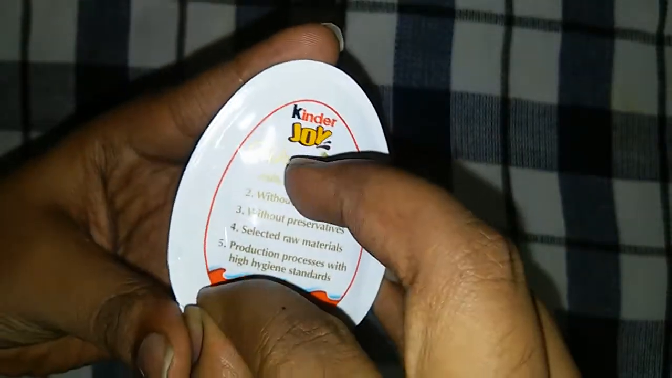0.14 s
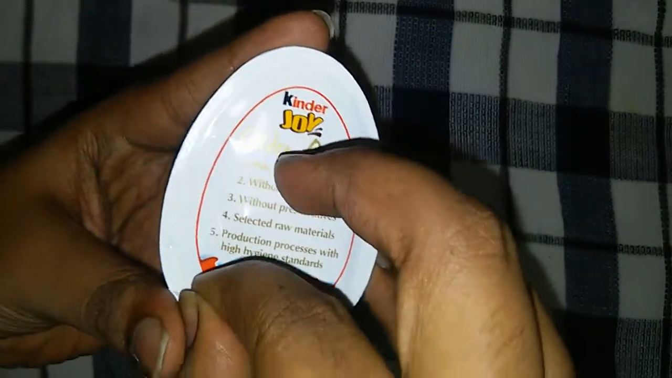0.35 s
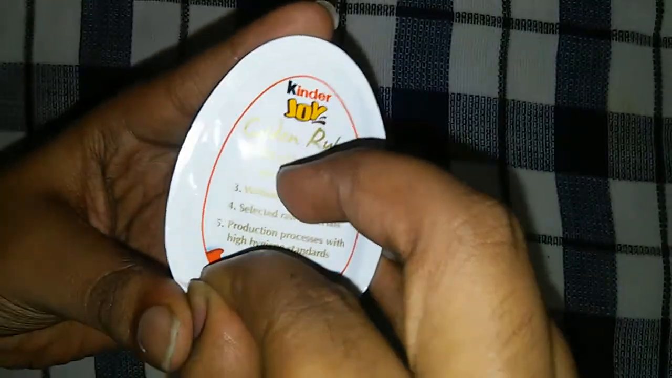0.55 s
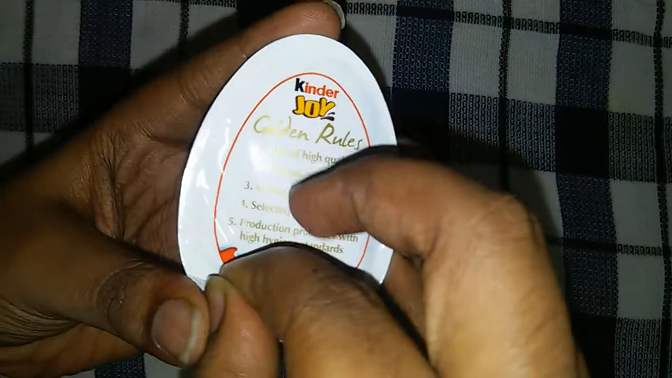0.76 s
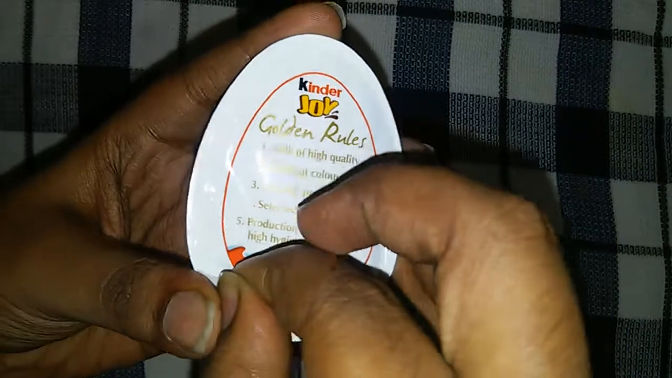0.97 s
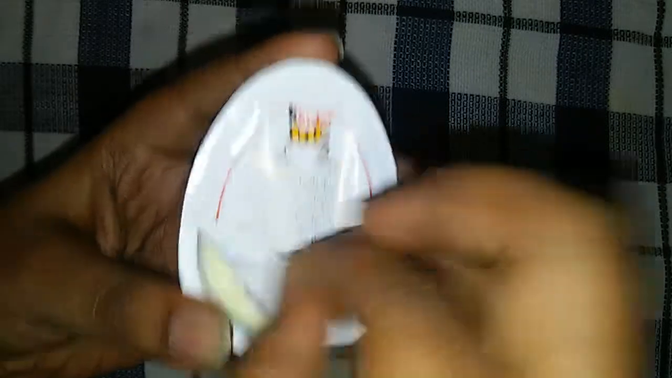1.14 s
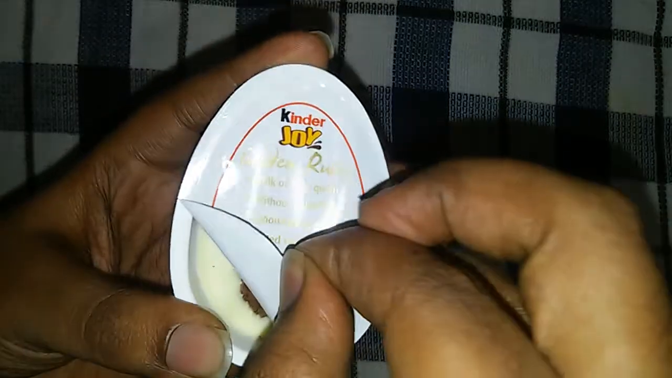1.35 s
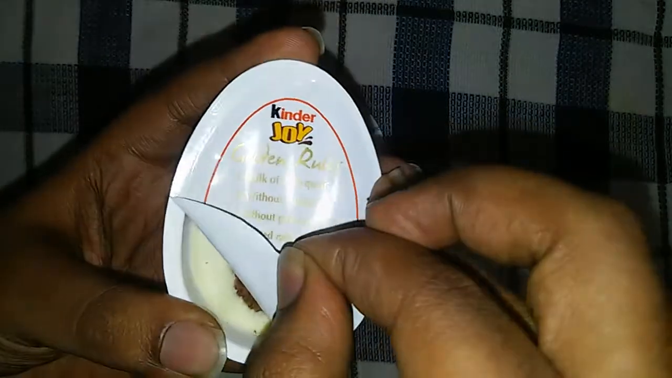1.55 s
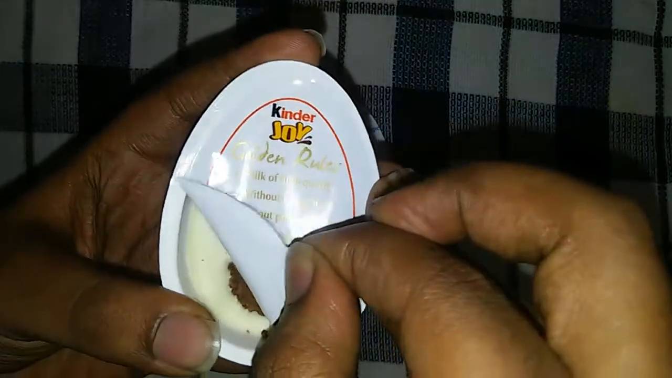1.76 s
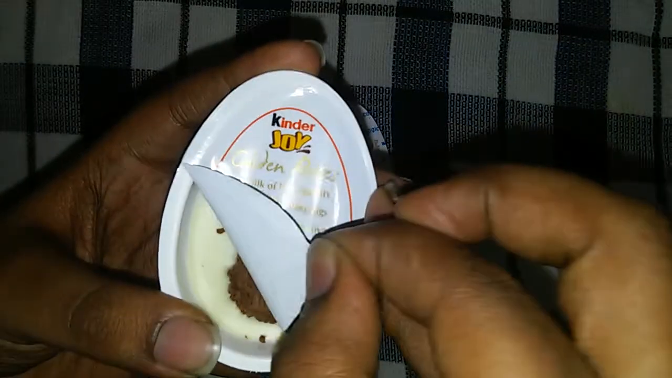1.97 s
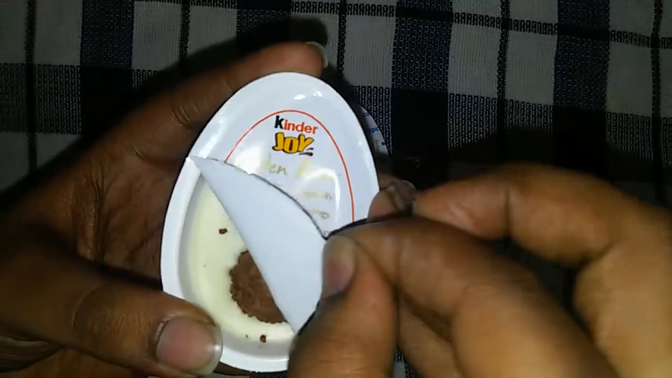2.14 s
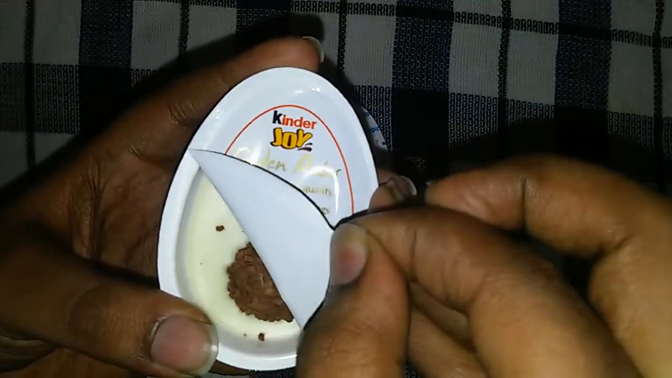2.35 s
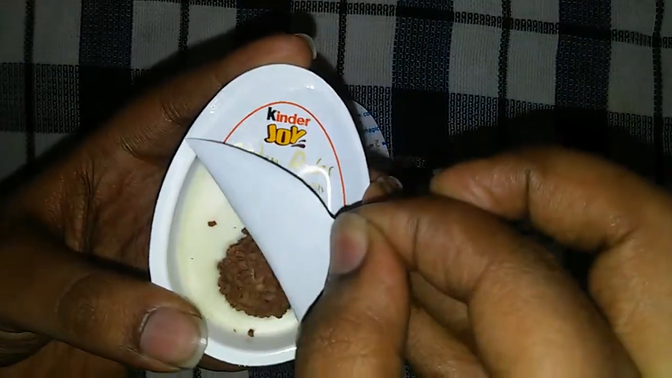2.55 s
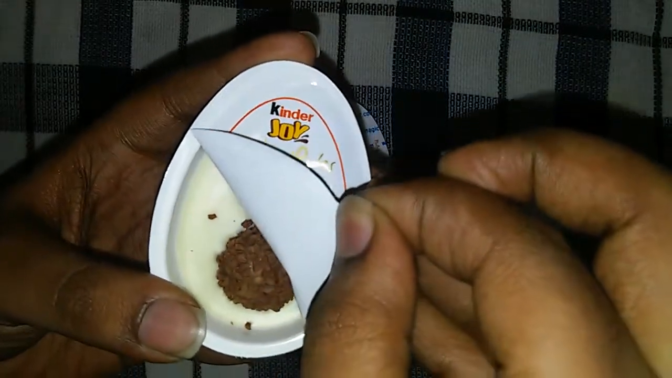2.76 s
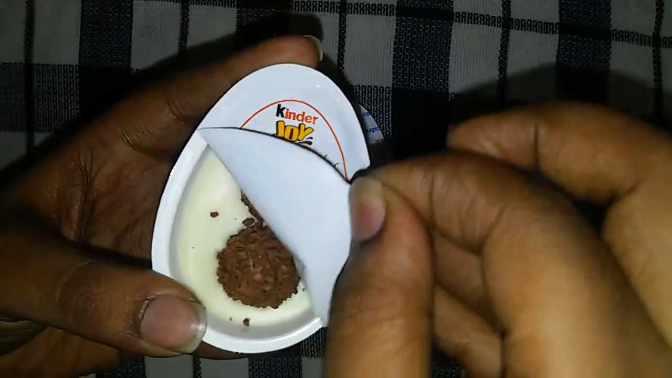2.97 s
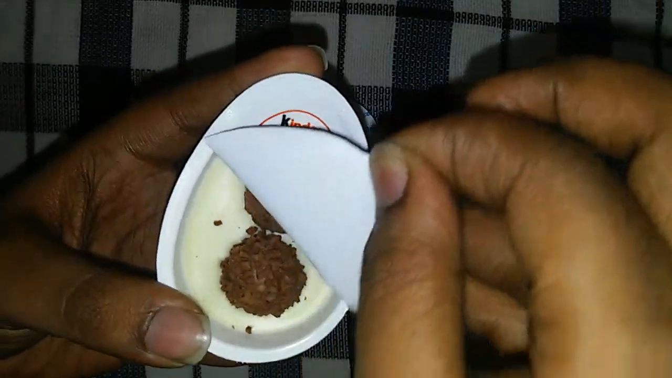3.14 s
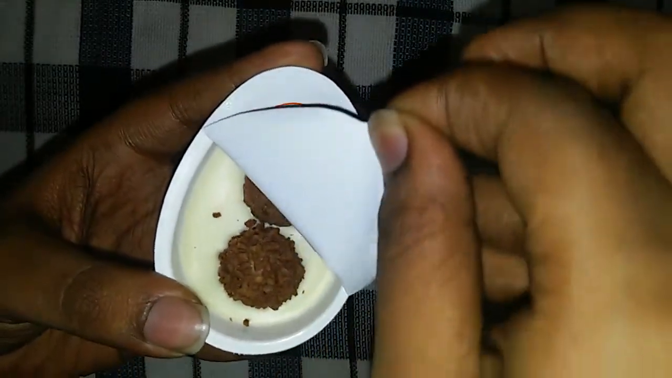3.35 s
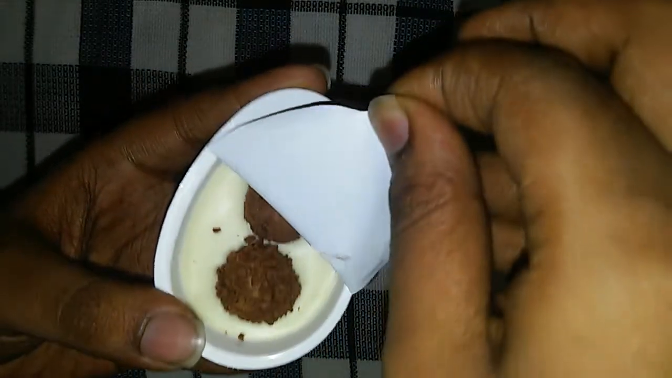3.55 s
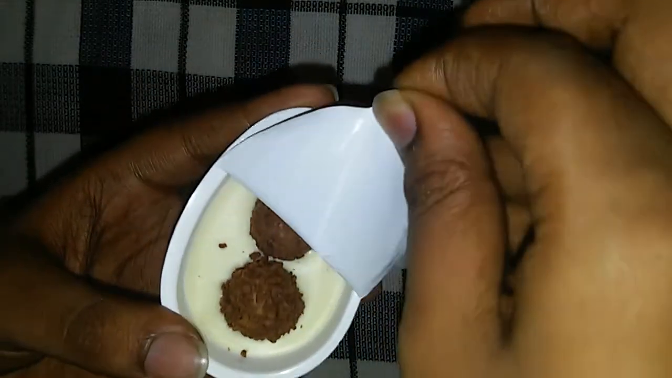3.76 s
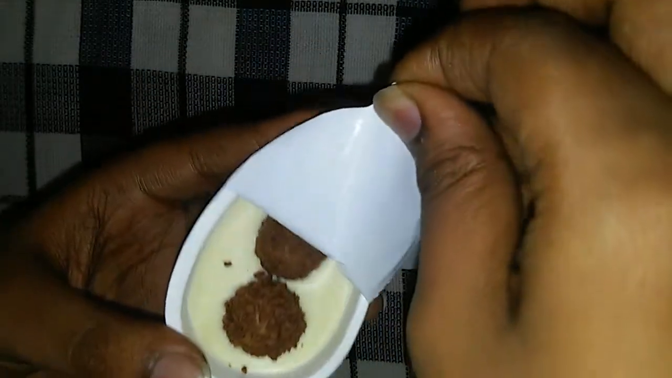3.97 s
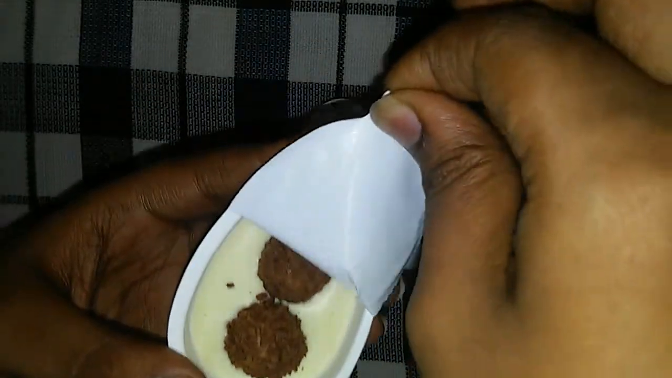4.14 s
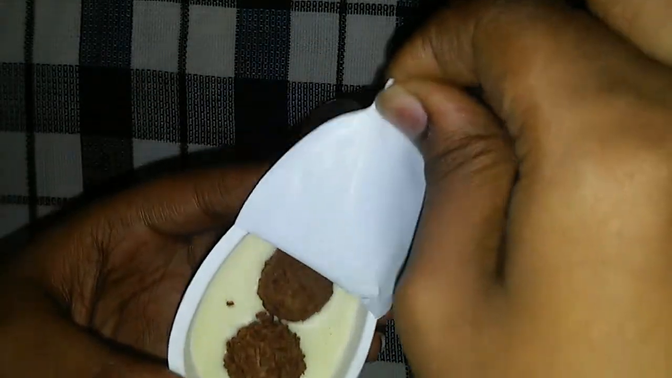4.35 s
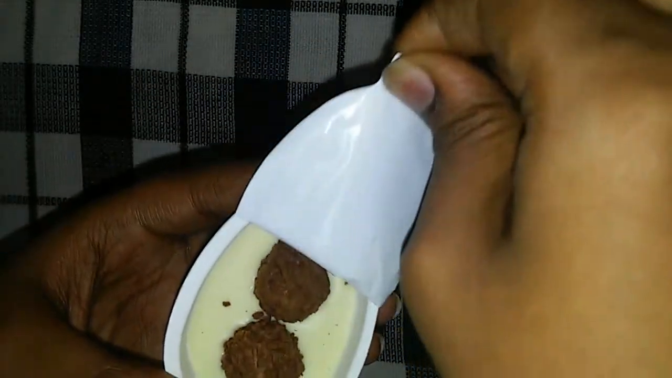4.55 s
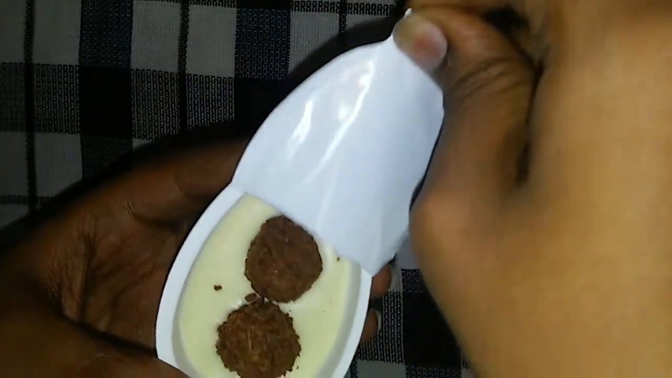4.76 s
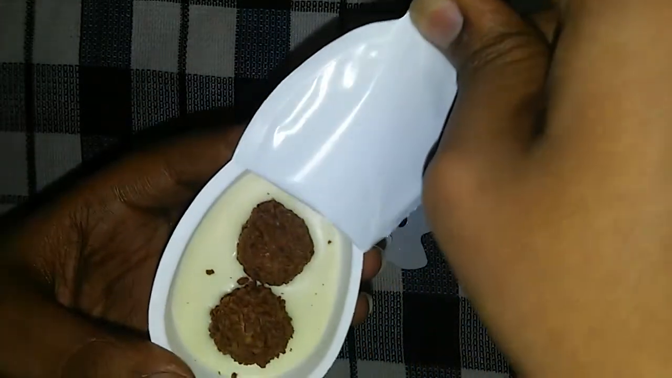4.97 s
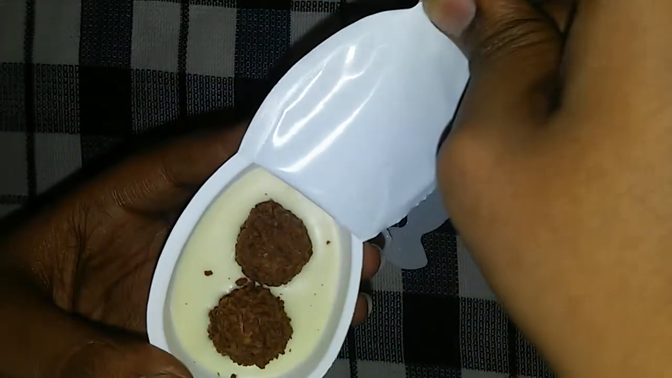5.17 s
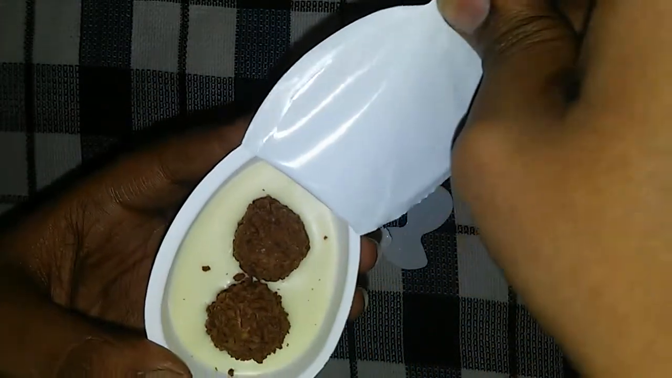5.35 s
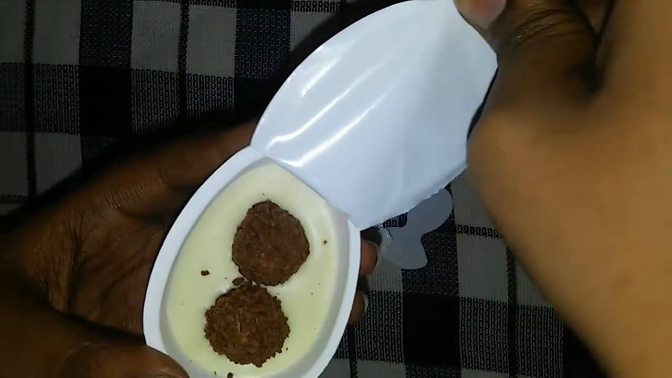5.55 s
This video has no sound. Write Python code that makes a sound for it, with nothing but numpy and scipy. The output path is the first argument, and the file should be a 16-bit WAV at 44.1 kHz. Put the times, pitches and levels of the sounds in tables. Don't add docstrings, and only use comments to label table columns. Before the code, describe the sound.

Very close to a phone microphone in a small room, a film lid is peeled from a plastic tray. After a quiet second with low handling rumble, loud crackling snaps burst out, then separate tears and hollow pops follow at irregular gaps. A fan faintly squeaks and swishes about every two thirds of a second, while hissy background opens and closes around the sounds.

```python
import sys
import numpy as np
from scipy import signal
from scipy.fft import rfft, irfft
from scipy.io import wavfile
from scipy.ndimage import uniform_filter1d, map_coordinates

SR = 44100
rng = np.random.default_rng(int(sys.argv[2]) if len(sys.argv) > 2 else 0)


def wrap_up_sound(samples):
    columns = np.atleast_2d(samples).T
    tamed = np.clip(columns, -1, 1)
    steps = np.round(tamed * 32767).astype(np.int16)
    wavfile.write(sys.argv[1], SR, steps)


def how_loud(loudness_db):
    steps = np.asarray(loudness_db, float) / 20
    return 10 ** steps


N = 247401


def unit(x):
    return x / np.sqrt(np.mean(x ** 2) + 1e-20)


def along(points, hz):
    f, v = np.transpose(points)
    return np.interp(np.log(hz + 1), np.log(f + 1), v)


def curves(rows):
    s, *cols = np.transpose(rows)
    return [np.interp(np.arange(N) / SR, s, c) for c in cols]


def wobble(rate):
    knots = rng.standard_normal(int(N * rate / SR) + 4)
    return map_coordinates(knots, [np.arange(N) * rate / SR])


def rush(spectrum, patchy_db):
    _, _, z = signal.stft(rng.standard_normal(N + 4096), SR, nperseg=512)
    patches = uniform_filter1d(rng.standard_normal(z.shape), 6, 0)
    patches = uniform_filter1d(patches, 10, 1)
    x = signal.istft(z * how_loud(patchy_db * unit(patches)), SR, nperseg=512)[1]
    colour = how_loud(along(spectrum, np.fft.rfftfreq(len(x), 1 / SR)))
    return unit(irfft(rfft(x) * colour, len(x))[:N])


def swell(start_s, hold_s, rise_s, fall_s):
    edge_db = -24
    first_s, last_s = start_s - rise_s, start_s + hold_s + fall_s
    rows = [(first_s, edge_db), (start_s, 0), (start_s + hold_s, 0), (last_s, edge_db)]
    t = np.arange(N) / SR
    soft_ends = np.clip(np.minimum(t - first_s, last_s - t) / 0.008, 0, 1)
    return soft_ends * how_loud(curves(rows)[0])


# pitch_hz [Hz], level_db [dB per Hz]
MURMUR_COLOUR = [(88, -49), (150, 5), (294, -6), (472, 2.5), (692, -3.5), (988, -10.5), (1220, -8),
                 (1550, -16), (3500, -24.5), (4550, -53.5), (7700, -120)]


def far_room(gate_db):
    whine_hz = 15625
    whine = how_loud(-3.5 + 1.3 * wobble(30)) * np.sin(2 * np.pi * whine_hz * np.arange(N) / SR)
    murmur = rush(MURMUR_COLOUR, patchy_db=1.5)
    return how_loud(gate_db) * (how_loud(7.0) * murmur + whine)


# pitch_hz [Hz], level_db [dB per Hz]
HISS_COLOUR = [(1470, -56.5), (2500, -18), (3680, -25.5), (4080, -20.5), (6600, -16), (9720, -9.5),
               (11300, -7), (16100, -17), (16500, -41)]


def gated_hiss(gate_db):
    level_db, growth = 2, 1.1
    widest_db = gate_db.max()
    hiss_db = level_db + widest_db + growth * (gate_db - widest_db)
    return how_loud(hiss_db) * rush(HISS_COLOUR, patchy_db=2.8)


# pitch_hz [Hz], level_db [dB per Hz]
RUMBLE_COLOUR = [(12, -45), (20, -15.5), (27, -27.5), (87, 5), (134, -7), (167, -11.5), (250, -10.5),
                 (320, -58.5), (550, -120)]
# time_s [s], level_db [dB over the murmur]
GRIP = [
    (0.4, 2),
    (0.9, 22),
    (1.1, 6),
    (1.6, 14.5),
    (1.9, 6.5),
    (2.3, 2),
    (3.1, 5.5),
    (5.6, 2.5),
]
# start_s [s], peak_db [dB], pitch_hz [Hz]
BUMPS = [(0.7, -54, 53.8), (0.873, -33, 94), (0.922, -30, 98), (1, -56, 53.5), (1.102, -51, 64),
         (1.411, -35.5, 78), (1.472, -38, 116), (1.572, -30, 48.7), (1.762, -33.5, 48.8),
         (1.931, -40, 95.4), (2.169, -43.5, 83), (3.071, -51.5, 80), (3.151, -47.5, 80),
         (5.586, -46.5, 61.4)]


def hands(gate_db):
    bumps, t = np.zeros(N + SR), np.arange(SR // 10) / SR
    for start_s, peak_db, pitch_hz in BUMPS:
        shake = t / 0.0067 * np.exp(1 - t / 0.0035)
        bump = how_loud(peak_db + 12.0) * np.sin(2 * np.pi * pitch_hz * t) * shake
        bumps[round(start_s * SR):][:len(t)] += bump
    unsteady = how_loud(3 * wobble(20))
    rumble = unit(unsteady * rush(RUMBLE_COLOUR, patchy_db=1.9))
    return bumps[:N] + how_loud(gate_db + curves(GRIP)[0] + 0.5) * rumble


# start_s [s], squeak_length_s [s], squeak_db [dB], swish_length_s [s], swish_db [dB]
TURNS = [
    (0.068, 0.078, -61, 0.083, -57),
    (0.755, 0.1, -56, 0.071, -50),
    (1.408, 0.097, -42, 0.13, -45),
    (2.08, .11, -47, 0.11, -42.5),
    (2.781, 0.076, -61.5, 0.066, -53.5),
    (3.442, 0.052, -35.5, 0.098, -39),
    (3.92, 0.011, -56.5, .03, -73),
    (4.058, 0.11, -52, 0.06, -48.5),
    (4.76, .11, -47.5, 0.082, -50),
    (5.447, 0.095, -61, 0.028, -80.5),
]


def bearing():
    squeak_hz, sag_hz = 5182, 155
    sag_db = 5
    full_s = 0.085
    rise_s, fall_s = 0.018, 0.04
    octave_late_s, octave_db = 0.012, 4.5
    out, t, jitter = np.zeros(N), np.arange(N) / SR, 1 + 0.006 * wobble(140)
    beating = 0.35 * wobble(60) + 0.35 * wobble(250)
    smearing = [0.8 * wobble(600), 0.8 * wobble(700)]
    flutter = [[1.1], [0.6], [0.5]] + np.array([beating, *smearing])
    for start_s, length_s, db, *_ in TURNS:
        slowing = np.clip((t - start_s) / length_s, 0, 1)
        full = min(length_s / full_s, 1) ** 2
        hz = squeak_hz - full * sag_hz * min(1.2 * full_s / length_s, 1) * slowing ** 2
        phase = 2 * np.pi * np.cumsum(hz * jitter) / SR
        tone = how_loud(-sag_db * slowing) * swell(start_s, length_s, rise_s, fall_s)
        late_swell = swell(start_s + octave_late_s, length_s - octave_late_s, rise_s, fall_s)
        octave = full * np.sin(np.pi * (0.15 + 0.23 * slowing)) * late_swell
        harmonics = np.array([tone, how_loud(octave_db) * octave, how_loud(octave_db - 10.0) * octave])
        out += np.sum(how_loud(db) * harmonics * flutter * np.sin([[1], [2], [3]] * phase), 0)
    return out


# pitch_hz [Hz], level_db [dB per Hz]
BLADE_COLOUR = [(1760, -40), (3000, -28.5), (3380, -27.5), (4050, -17.5), (4760, -16.5), (5070, -19),
                (6090, -14), (6620, -17.5), (7350, -16.5), (10100, -1), (12600, -3.5), (14100, -17),
                (16000, -13.5)]


def fan_blades():
    gap_s, rise_s, fall_s, fade_db = 0.046, 0.069, 0.09, 7
    guard_hz, guard_db = 4000, -19.5
    t, sweep = np.arange(N) / SR, np.zeros(N)
    for squeak_start_s, squeak_s, _, swish_s, db in TURNS:
        start_s = squeak_start_s + squeak_s + gap_s
        fading_db = fade_db * np.clip((t - start_s) / swish_s, 0, 1)
        sweep += how_loud(db - fading_db) * swell(start_s, swish_s, rise_s, fall_s)
    guard = how_loud(guard_db) * wobble(120) * np.sin(2 * np.pi * guard_hz * t)
    ragged = how_loud(3.2 * wobble(30) + 0.98 * wobble(150))
    return sweep * ragged * (rush(BLADE_COLOUR, patchy_db=1.1) + guard)


# time_s [s], level_db [dB]
RUSTLE = [
    (2.28, -103),
    (2.33, -52.5),
    (2.38, -55),
    (2.46, -81),
]
# pitch_hz [Hz], level_db [dB per Hz]
SLIDE_COLOUR = [(600, -47), (1200, -4.5), (2200, -7.5), (3500, -13.5), (6000, -46)]


def lid_slide():
    grain = how_loud(3 * wobble(100))
    return how_loud(curves(RUSTLE)[0]) * grain * rush(SLIDE_COLOUR, patchy_db=2.5)


def hump(hz, centre_hz, spread, db):
    bell = np.exp(-(np.log(hz / centre_hz) / spread) ** 2 / 2)
    return (how_loud(db) / (centre_hz * spread) * bell) ** 2


def click(power):
    cep = irfft(np.log(power + 1e-7 * power.max()) / 2)
    cep[1:len(cep) // 2] *= 2
    cep[len(cep) // 2 + 1:] = 0
    return irfft(np.exp(rfft(cep)))


# pitch_hz [Hz], time to fall 60 dB decay_s [s]
ROOM = [(500, 0.76), (1500, 0.21), (4000, 0.2), (10000, 0.23), (16000, 0.16)]


def echo(x, early_db):
    hz, t, z = signal.stft(rng.standard_normal(SR // 2), SR, nperseg=256)
    decay = how_loud(-60 * t / along(ROOM, hz)[:, None])
    tail = signal.istft(z * decay, SR, nperseg=256)[1]
    t = np.arange(len(tail)) / SR
    shiver = 1 + how_loud(early_db - 60 * t / 0.015)
    tail = tail * (1 - np.exp(-t / 0.00075)) * shiver
    return signal.fftconvolve(x, tail / np.linalg.norm(tail))


def crack_burst():
    first_crack = 1.4
    t = np.arange(256) / SR
    cracks = rng.standard_normal(len(t)) * np.sqrt(t / SR) * np.exp(-t / 0.0015)
    return cracks / np.linalg.norm(cracks) + first_crack * (np.arange(len(t)) == 20)


# start_s [s], film_db [dB], tray_db [dB], lid_db [dB], room_tail_db [dB]
TEARS = [(1.1538, -16.5, -32.5, -31.5, 1.5), (1.1671, -3, -22, -20.5, 0.5), (1.169, -4, -10, -6.5, -6.5),
         (1.1946, -4.5, -11, -11, -3), (1.3484, -6.5, -14.5, -10, 2), (1.8864, -7, -21.5, -23, -6),
         (1.8945, 0.5, -11, -9, -13), (2.1473, 1.5, -10.5, -9.5, -10), (3.3754, -10, -24.5, -12.5, 4.5),
         (4.5227, -1, -22, -35.5, -2), (4.522, -7.5, -31, -20, 7), (5.109, -2, -22, -17.5, -9),
         (5.563, -3.5, -29, -26, 2.5), (5.5783, -3, -39, -33, 2), (5.5844, 0.5, -23, -56.5, -4)]
# start_s [s], film_db [dB], tray_db [dB], lid_db [dB], tray_pitch_hz [Hz]
TICKS = [(1.1618, -23.5, -18.5, -27, 1670), (1.179, -30.5, -23.5, -22.5, 1600),
         (2.9536, -64, -43, -69, 462), (1.272, -43, -48, -43, 2140), (2.9532, -30, -28, -43.5, 2460),
         (3.051, -32.5, -36, -42, 2670), (3.0616, -49.5, -43, -54, 1230), (3.1193, -29, -29, -28, 2750),
         (4.047, -71, -48, -67.5, 1200), (4.0442, -31, -31.5, -31, 2970), (4.524, -60, -28, -60, 1220),
         (3.1197, -70, -40, -70, 1100)]
# start_s [s], film_db [dB], tray_db [dB], lid_db [dB], tray_pitch_hz [Hz]
POPS = [
    (4.4377, -62, -41, -45, 1250),
    (1.373, -60, -31, -60, 830),
    (1.2914, -49.5, -30, -60, 2240),
    (1.3717, -25.5, -11, -29.5, 2270),
    (1.3862, -16, -10, -27, 2560),
    (1.9999, -29, -18.5, -24, 2400),
    (3.7588, -5, -13, -17, 1642),
    (3.834, -57, -20, -36, 2120),
]


def peeling():
    tear_tray_hz, tear_lid_hz, tear_rim_db = 2235, 4263, 1.5
    small_lid_hz, small_rim_db = 3800, -2
    tray_spread, thud_db = 0.29, -26
    snaps = []
    for s, film_db, tray_db, lid_db, tail_db in TEARS:
        snaps.append((s, film_db, tray_db, lid_db, tear_tray_hz, tear_lid_hz, lid_db + tear_rim_db, tail_db))
    for rows, tail_db in ((TICKS, -0.5), (POPS, -13)):
        snaps += [(*row, small_lid_hz, row[1] + small_rim_db, tail_db) for row in rows]

    out, hz = np.zeros(N + SR), np.fft.rfftfreq(1024, 1 / SR) + 1
    for s, film_db, tray_db, lid_db, tray_hz, lid_hz, rim_db, tail_db in snaps:
        film = hump(hz, 11670, 0.24, film_db) + hump(hz, 9400, 0.067, film_db - 23.5)
        tray = hump(hz, tray_hz, tray_spread, tray_db - 2.0) + hump(hz, 1300, 0.36, tray_db - 15.5)
        lid = hump(hz, lid_hz, 0.23, lid_db)
        rim = hump(hz, 5900, 0.38, rim_db)
        port = 1 / (1 + (hz / 13600) ** 14)
        pulse = 0.3 * SR * click((film + tray + lid + rim) * port)
        thud = 0.3 * SR * click(hump(hz, 450, 0.31, tray_db + thud_db))
        snap = 0.5 * np.convolve(pulse + thud, crack_burst())
        wet = how_loud(tail_db + 4.5) * echo(pulse, early_db=12)
        start = round(s * SR)
        out[start:][:len(snap)] += snap
        out[start:][:len(wet)] += wet
    return out[:N]


# time_s [s], level_db [dB]
GATE = [(0.0, -84), (0.23, -75), (0.62, -86), (0.97, -66), (1.39, -58), (1.73, -64), (1.95, -63),
        (2.39, -60), (2.61, -80.5), (2.8, -78.5), (2.92, -66.5), (3.37, -73), (3.41, -57.5), (4.51, -71.5),
        (4.56, -60), (5.2, -67), (5.37, -74), (5.61, -75)]


def scene():
    gate_db, = curves(GATE)
    background = far_room(gate_db) + gated_hiss(gate_db)
    fan = bearing() + fan_blades()
    lid = lid_slide() + peeling()
    return (background + hands(gate_db) + fan + lid)[None]


def low_pass(x):
    return signal.sosfilt(signal.butter(12, 16830, fs=SR, output="sos"), x)


# pitch_hz [Hz], level_db [dB per Hz]
SELF_COLOUR = [(18, -41.5), (30, 7), (48, -9.5), (163, -15.5), (291, -39.5), (480, -24.5), (814, -21.5),
               (1180, -27.5), (4530, -32), (15200, -32.5), (16500, -34)]


def record(dry):
    self_db, top_hz, bottom_hz = -74, 15850, 35
    x = dry + how_loud(self_db) * rush(SELF_COLOUR, patchy_db=3)
    x = signal.sosfilt(signal.ellip(12, 0.5, 34, top_hz, fs=SR, output="sos"), x)
    x = signal.sosfilt(signal.butter(2, bottom_hz, btype="high", fs=SR, output="sos"), x)
    x = x / (1 + np.abs(x / 1.02) ** 8) ** (1 / 8)
    return low_pass(x)


dry = scene()
out = record(dry)
wrap_up_sound(out)
```